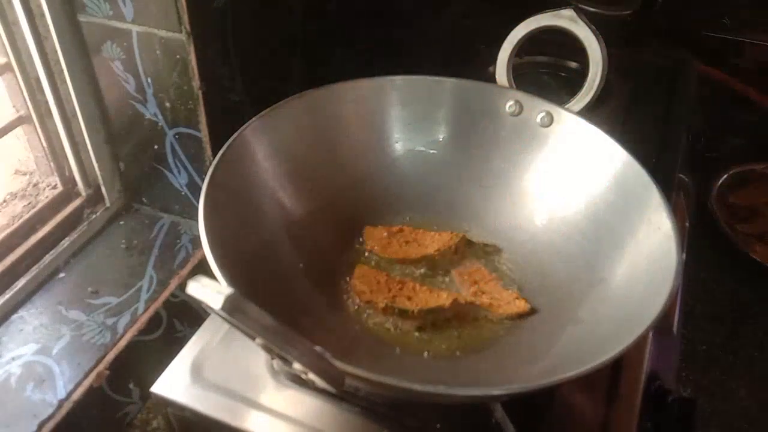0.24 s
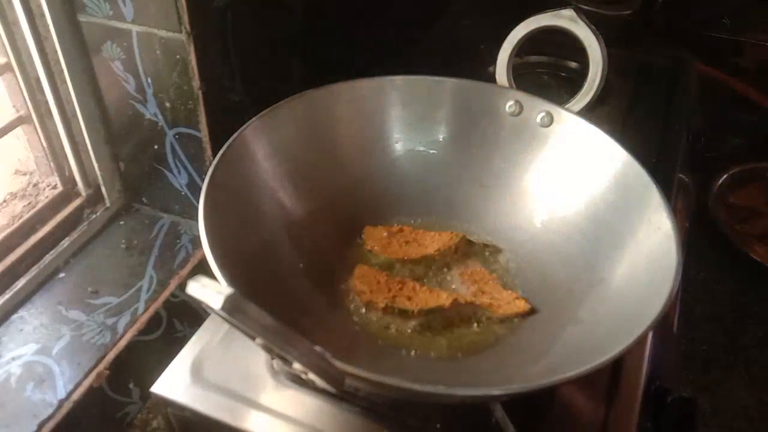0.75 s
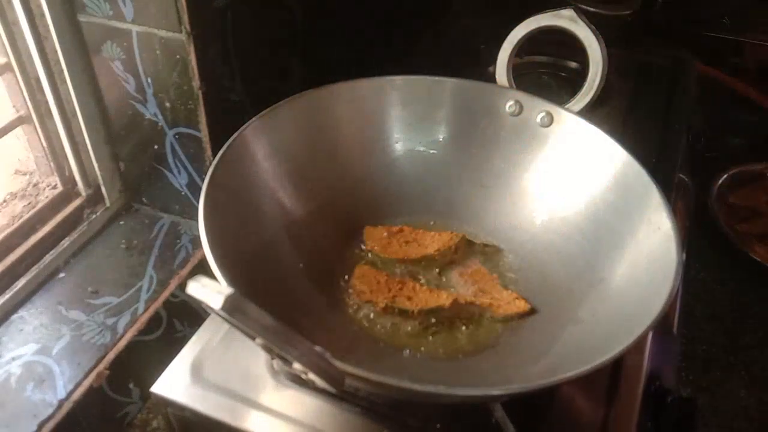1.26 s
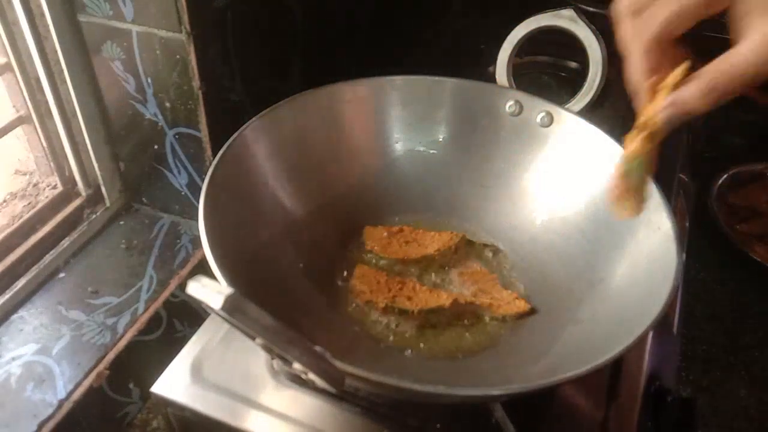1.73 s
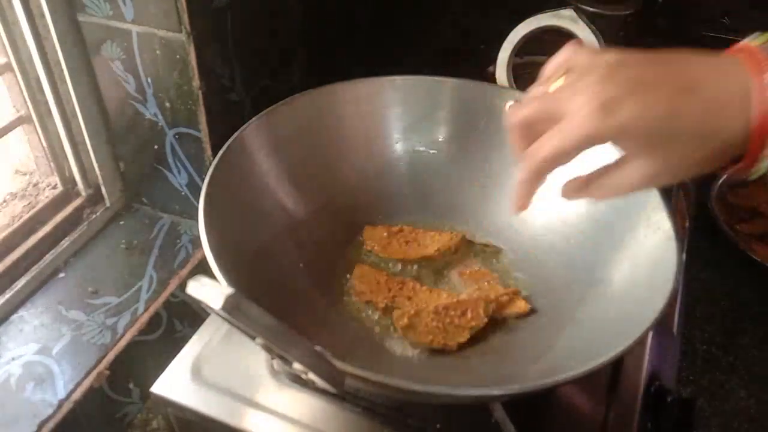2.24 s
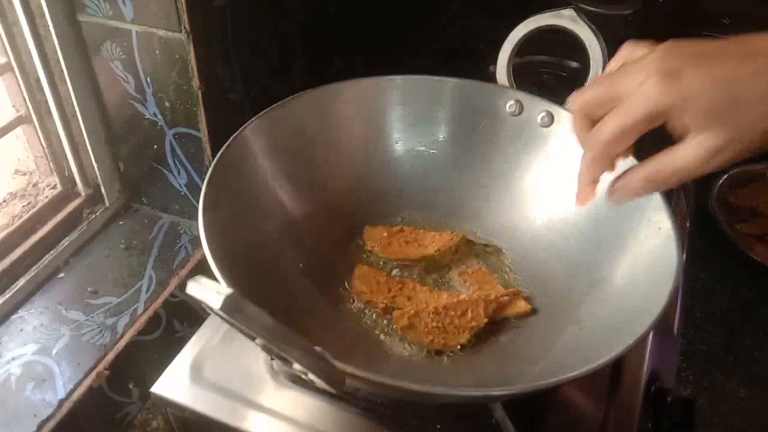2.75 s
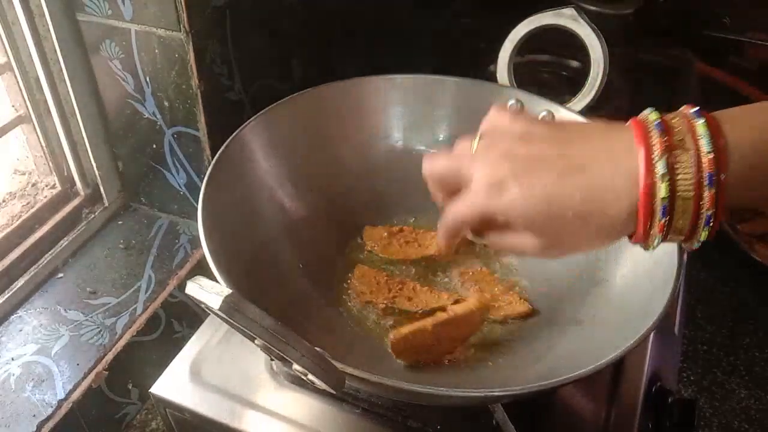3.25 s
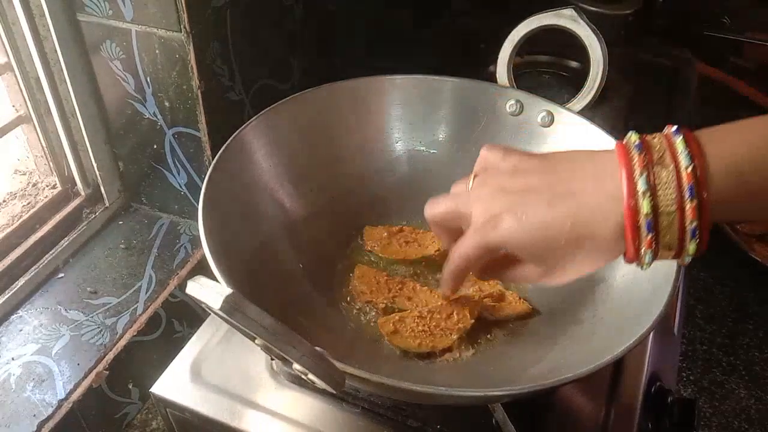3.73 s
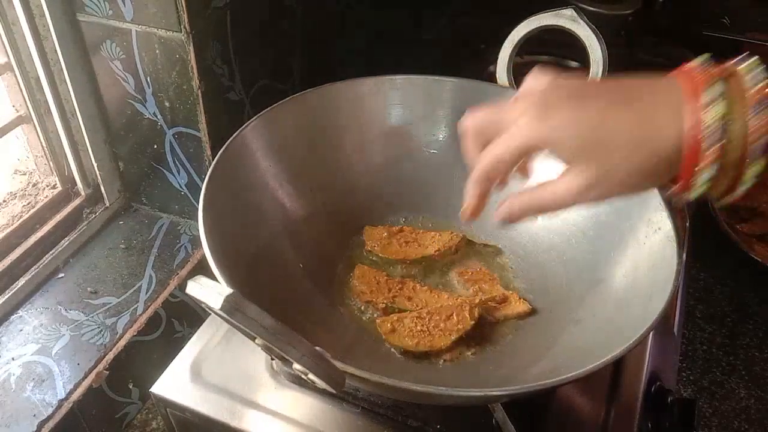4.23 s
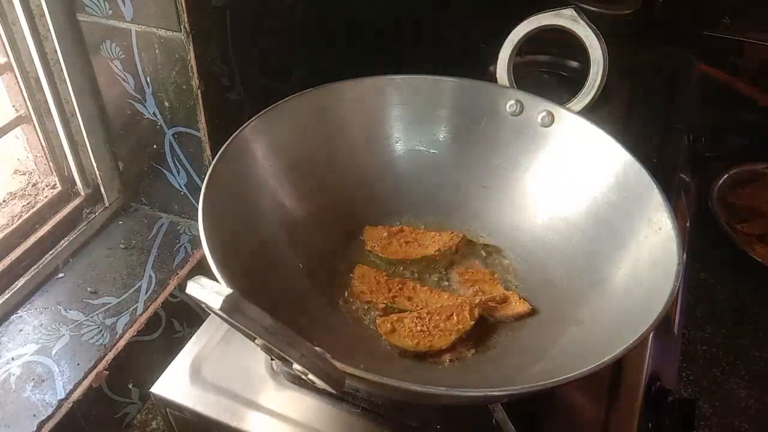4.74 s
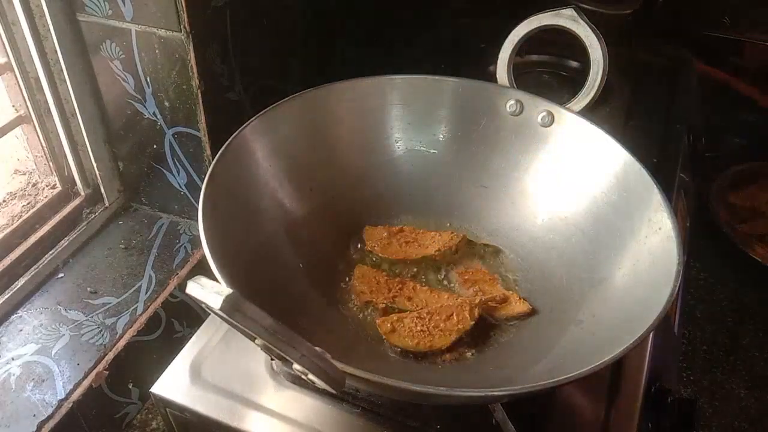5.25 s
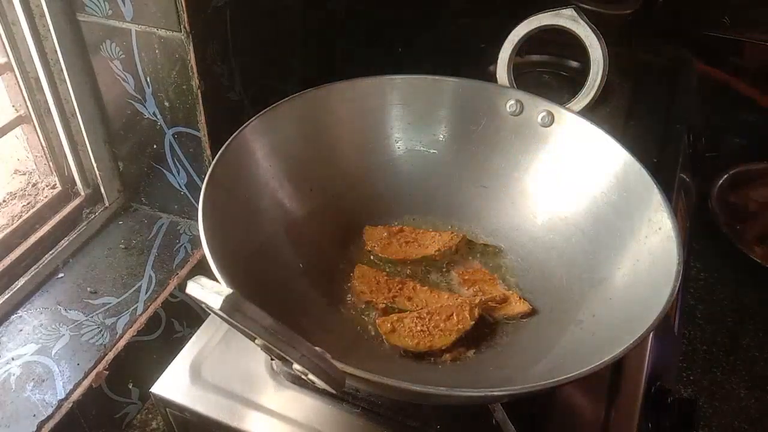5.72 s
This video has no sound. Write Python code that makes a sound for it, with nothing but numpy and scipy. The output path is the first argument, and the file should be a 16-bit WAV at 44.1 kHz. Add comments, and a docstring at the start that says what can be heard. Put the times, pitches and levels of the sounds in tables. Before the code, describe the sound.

Shallow frying in a steel wok, heard in stereo from just above it in a small kitchen with a very short echo. A quiet, low stove rush and faint hum continue throughout under bubbling oil and a thin, high fizz. At 0.1-0.25 s a few bubble pops and short steam puffs stand out; small spits and dry cracks tick between 0.4 and 0.7 s as the sizzle dips. From about 1.2 s pops become more frequent, with a sharp spit near 1.35 s. Between 2 and 4.6 s the boil strengthens: rapid, short, mid-high wet pops, deeper bubbling swells, faint metallic ringing from the bowl, and occasional spits that flare the fizz. It eases slightly around 4.7 s. At about 5.1 s the treble abruptly opens and the stereo image shifts; hard cracks and droplet flurries cluster until 5.55 s, then brighter sizzling and pops continue to the cut at 6 s.

```python
"""Small kitchen, microphone just above a steel wok: coated vegetable slices fry in shallow oil.
From the start a stove hums under small and deep bubbles and a fine fizz; steam rushes out, large bubbles pop.
The bowl and the walls answer. Then droplets spit, flaring the fizz, and trapped water cracks.
Close to 5.1 s the treble opens up, the stereo image shifts and flurries of droplets crackle.
Bubbles and spits are short decaying sines; cracks, steam, hiss and stove rush are shaped noise."""
import sys
import numpy as np
from scipy import signal
from scipy.fft import rfft, irfft, next_fast_len
from scipy.io import wavfile
from scipy.ndimage import uniform_filter1d, minimum_filter1d, map_coordinates

SR = 44100
rng = np.random.default_rng(int(sys.argv[2]) if len(sys.argv) > 2 else 0)


def int16_out(signal):
    """Quantize to a 16-bit WAV file."""
    q = np.round(np.clip(np.atleast_2d(signal).T, -1, 1) * 32767)
    wavfile.write(sys.argv[1], SR, q.astype(np.int16))


N = 263884

# Levels in the tables are relative: each source adds its own trim. Tone tables are spectral shapes.
# stove rush: [f/Hz, level/dB]
STOVE_TONE = [(15, -73), (25, -27), (43, -28.5), (97, -4.5), (140, -0.5), (183, -4), (269, -0.5),
              (302, -3.5), (333, 2.5), (368, -5), (401, 1), (504, -9), (606, -12), (750, -13.5),
              (980, -15.5), (1650, -120)]
# stove hum partials: [f/Hz, level/dB]
HUM_PARTIALS = [(134.6, -45.5), (204.6, -78), (274.5, -47), (403.7, -43.5)]
# deep bubbles under the slices, strength over time: [t/s, level/dB]
SIMMER_LEVEL = [(0, -44.5), (0.75, -43.5), (1.7, -44), (2.7, -39), (3.3, -41.5), (3.8, -35.5), (4.4, -41),
                (5.35, -39), (5.7, -35), (5.98, -38)]
# their spectrum: [f/Hz, level/dB]
SIMMER_TONE = [(500, -28), (800, -10.5), (1050, -3.5), (1260, 3), (1450, -19), (2000, -24.5), (4000, -76)]
# how hard the oil boils, as strength of the small bubbles: [t/s, level/dB]
BOIL_LEVEL = [(0.0, -30), (0.6, -35.5), (0.9, -36.5), (1.35, -28), (1.48, -34), (1.92, -26.5), (2.4, -29),
              (2.76, -31), (3.0, -23.5), (3.3, -28.5), (3.66, -25.5), (4.73, -29), (5.0, -25.5), (5.2, -31),
              (5.41, -30), (5.98, -28.5)]
# spectrum of the small bubbles: [f/Hz, level/dB]
BUBBLE_TONE = [(350, -60), (600, -21), (660, -12.5), (864, -10.5), (1240, -2.5), (1400, -14), (1630, -12.5),
               (1820, -6.5), (2040, -3.5), (2540, -1), (3010, -2.5), (3150, -12), (3500, -7), (4000, -43.5),
               (5200, -74), (8800, -120)]
# strength of the fizz: [t/s, level/dB]
FIZZ_LEVEL = [(0, -35.5), (0.1, -37.5), (0.3, -40), (0.5, -41.5), (0.78, -41.5), (0.84, -36.5), (0.87, -42),
              (0.93, -43), (0.98, -37.5), (1.35, -36), (1.48, -39), (1.6, -36), (1.9, -35.5), (2.18, -39),
              (2.3, -38), (2.9, -34), (3.85, -39.5), (4.06, -33), (4.3, -34.5), (4.38, -36.5),
              (4.47, -35.5), (4.65, -37), (5.21, -34.5), (5.26, -32.5), (5.35, -30), (5.41, -35),
              (5.47, -33), (5.55, -38), (5.6, -36), (5.67, -38), (5.75, -34), (5.98, -33.5)]
# spectrum of the fizz: [f/Hz, level/dB]
FIZZ_TONE = [(2120, -50), (3600, -6), (3940, -26), (5060, -3), (5750, -14), (6040, -18.5), (6820, 3),
             (7110, 5.5), (8080, -11), (9070, -7), (10400, -30), (11200, -18.5), (12300, -37), (14600, -26),
             (15400, -27)]
# spectrum of the fizz once it opens up: [f/Hz, level/dB]
OPEN_FIZZ_TONE = [(1940, -49), (3300, 6), (3800, -12.5), (4380, 2.5), (6090, -6), (6880, 2.5), (7290, -1),
                  (7700, -19), (8510, -19.5), (9400, -26), (10700, -7), (12100, -31), (15400, -53)]
# steam escaping from under the coating: [t/s, level/dB, rise/s, fall/s, centre f/Hz, width/octaves]
PUFFS = [(0.075, -32, .06, .02, 2800, .15), (0.203, -26, .003, .045, 1950, .3),
         (0.228, -28.5, .006, .04, 1100, .55), (0.706, -28, .002, .045, 2800, .17),
         (0.711, -37, .006, .014, 8800, .07)]
# large bubbles bursting: [t/s, level/dB, mid-glide cavity f/Hz, ring time/s, film snap level/dB]
POPS = [(0.083, -26, 2680, 0.0035, -2), (0.1057, -6.0, 2030, 0.0017, -4), (0.116, -11.5, 2430, 0.006, -18),
        (0.1302, -15, 2340, 0.0068, -13), (0.442, -4.5, 2220, 0.0027, -7), (0.7072, -19, 2850, 0.0035, -16),
        (0.8351, -15.5, 1230, 0.0031, -10), (0.9841, -8, 1320, 0.00077, 3),
        (1.1516, -11.5, 1860, 0.0032, -1), (1.245, -10, 1950, 0.0019, 11),
        (1.2934, -13.5, 2700, 0.0033, -14), (1.3896, -15, 2730, 0.0024, -2),
        (1.6232, -14.0, 2870, 0.0024, -1), (1.6404, -6.5, 2580, 0.0021, -15),
        (1.673, -12, 1220, 0.0018, -6), (1.7407, -11, 2640, 0.00062, -12),
        (1.7555, -14.5, 2630, 0.0054, -7), (1.852, -12.5, 2330, 0.0015, -1),
        (1.8622, -10.5, 2210, 0.0025, 5), (1.911, -13.5, 2310, 0.0041, -4), (1.93, -13.5, 2000, 0.0046, -5),
        (1.9602, -16, 2090, 0.0039, -1), (2.0282, -10.5, 2400, 0.0048, -4), (2.1087, -13, 2340, 0.0045, 1),
        (2.128, -12.5, 2690, 0.0041, -13), (2.175, -18, 2390, 0.0027, 7), (2.2209, -10, 2680, 0.0054, -3),
        (2.293, -8, 2690, 0.0029, 5), (2.3685, -18, 2900, 0.0031, -5), (2.4764, -9, 1870, 0.0028, 19),
        (2.514, -16.5, 2600, 0.0017, -3), (2.5893, -18, 2600, 0.0019, -9), (2.628, -9.5, 2150, 0.00077, 9),
        (2.6468, -13, 2425, 0.0048, 7), (2.6735, -9.5, 2677, 0.0015, -5), (2.6932, -9, 2460, 0.0038, 4),
        (2.7791, -23, 2410, 0.0035, 2), (2.8266, -7, 2420, 0.0018, 9), (2.876, -6.5, 2594, 0.0027, -17),
        (2.9044, -13, 1300, 0.0027, -3), (2.9708, -15, 2160, 0.0024, 17), (3.0613, -6, 2040, 0.0019, 2),
        (3.112, -8, 2437, 0.0026, 1), (3.1575, -9.5, 2150, 0.0029, 6), (3.1827, -14.0, 2720, 0.0023, -17),
        (3.2135, -7, 2230, 0.003, -17), (3.3321, -12.5, 2380, 0.00085, 7), (3.3632, -12, 2690, 0.0039, -11),
        (3.4191, -12.5, 2560, 0.0035, 4), (3.4463, -12.5, 2900, 0.0044, 5), (3.4834, -5, 2330, 0.001, -14),
        (3.5187, -8.0, 1990, 0.0015, 3), (3.5277, -6, 1910, 0.0046, 5.5), (3.543, -13.5, 1900, 0.0035, -1),
        (3.5895, -7.5, 1910, 0.0045, -1), (3.6683, -18, 2570, 0.0025, -3), (3.7143, -24, 2000, 0.0035, 2),
        (3.729, -6, 2130, 0.00075, 13), (3.7602, -11, 2720, 0.0022, 1), (3.7873, -18, 1310, 0.0035, -6),
        (3.8073, -12, 2610, 0.00079, -6), (3.8785, -4.5, 2435, 0.0047, 3.5),
        (3.8921, -7.5, 1440, 0.0017, -9), (3.967, -7.5, 2260, 0.0031, -1),
        (3.9846, -11.5, 2270, 0.0015, -10), (4.004, -12.5, 2700, 0.002, -15),
        (4.0233, -5, 2150, 0.00084, 7), (4.0578, -4.5, 1855, 0.0013, 1), (4.096, -7.5, 2360, 0.0025, 10),
        (4.1842, -7, 2275, 0.0013, 0), (4.207, -13, 2690, 0.0023, -11), (4.2634, -7.0, 2000, 0.0018, -3),
        (4.2843, -9.5, 2550, 0.0022, -12), (4.371, -2, 2055, 0.0027, -12), (4.497, -19, 1260, 0.0028, -6),
        (4.5191, -13.0, 2180, 0.001, -4), (4.5704, -4, 2187, 0.001, -5), (4.5934, -16, 2280, 0.0038, -5),
        (4.617, -13.5, 1250, 0.0025, -8), (4.7544, -9.5, 2620, 0.0029, 0), (4.7932, -14, 2630, 0.0035, -1),
        (4.8202, -15, 2660, 0.0033, -10), (4.8778, -9.5, 1790, 0.0039, -6),
        (4.9107, -17, 2490, 0.00084, -1), (4.9622, -15.5, 1250, 0.0024, -3),
        (5.0102, -6.5, 2360, 0.003, -17), (5.0436, -10, 2700, 0.002, -11), (5.1394, -13, 1240, 0.0031, -4),
        (5.1526, -8, 2360, 0.0018, 9), (5.163, -8.5, 2910, 0.0035, 4), (5.248, -9.5, 2640, 0.0015, -12),
        (5.2755, -7.5, 2370, 0.0026, -2.5), (5.3402, -7, 2120, 0.0029, 5), (5.4506, -11, 1840, 0.0021, 8),
        (5.4974, -8.5, 2170, 0.0015, 3), (5.5636, -16.0, 2270, 0.0023, -6), (5.5745, -6, 2200, 0.0016, 9),
        (5.6085, -8.5, 2960, 0.0024, -18), (5.6547, -15, 2460, 0.0054, 0), (5.733, -11.5, 2900, 0.003, 3),
        (5.7783, -12.5, 2390, 0.002, -10), (5.8034, -12, 2380, 0.0043, -8), (5.8222, -6, 1830, 0.004, 10),
        (5.8631, -12, 2470, 0.0038, -2), (5.91, -14.5, 2360, 0.0043, -8), (5.9365, -11, 2270, 0.0025, -5),
        (5.964, -10, 2540, 0.0021, -16)]
# steel modes of the wok: [f/Hz, level/dB, t60/s]
WOK_MODES = [(1037, 1, 0.17), (1270, 2, 0.11), (1510, -8, 0.16), (1842, 3.5, 0.044), (2040, -2, 0.19),
             (2230, 3, 0.11), (2410, -0.5, 0.13), (2596, 5.5, 0.17), (2720, -9, 0.32), (2800, 0, 0.17),
             (2980, 7, 0.2)]
# reverberation time of the kitchen: [f/Hz, t60/s]
KITCHEN_T60 = [(300, 0.17), (2500, 0.17), (10000, 0.14)]
# droplets spitting: [t/s, level/dB, starting f/Hz, decay of the fizz that follows/s]
SPITS = [(0.233, -12, 4860, 0.0014), (0.546, -18.5, 7000, 0.011), (0.603, -17.5, 6720, 0.017),
         (0.652, -17.5, 7030, 0.0067), (0.7088, -22, 8500, 0.003), (1.151, -20, 5000, 0.01),
         (1.2452, -20, 4470, 0.006), (1.348, -9.5, 7050, 0.012), (1.617, -15.5, 7350, 0.031),
         (1.6215, -20, 8770, 0.005), (1.905, -19, 7100, 0.023), (2.2855, -13.5, 6960, 0.053),
         (2.765, -18, 8300, 0.008), (2.8838, -24, 8850, 0.02), (3.1582, -16, 5200, 0.011),
         (3.546, -15.5, 7350, 0.08), (3.668, -18, 6940, 0.15), (3.9453, -16, 6970, 0.065),
         (4.046, -16, 7100, 0.023), (4.184, -15, 6900, 0.018), (4.2545, -20, 8400, 0.015),
         (5.1407, -16, 8100, 0.008), (5.144, -11.5, 5240, 0.037), (5.2551, -18, 4940, 0.02),
         (5.3125, -16, 4770, 0.008), (5.3455, -22, 7000, 0.022), (5.4427, -15, 4750, 0.016),
         (5.4965, -29, 4780, 0.0088), (5.5274, -11, 6420, 0.011)]
# spectrum of a spit's click: [f/Hz, level/dB]
CLICK_TONE = [(3000, -21), (6500, 18), (9000, -6), (11500, -23), (15000, -28)]
# dry, broad cracks of water bursting in the oil: [t/s, level/dB]
CRACKS = [(0.396, -20), (0.631, -30), (0.705, -17), (1.246, -30), (1.3897, -18), (5.1402, -23),
          (5.151, -11), (5.1644, -24), (5.247, -9.5), (5.277, -13), (5.3118, -14), (5.343, -19),
          (5.3489, -11), (5.364, -21), (5.433, -33), (5.453, -27), (5.465, -15.5), (5.488, -15),
          (5.5265, -14.5)]
# spectrum of a crack: [f/Hz, level/dB]
CRACK_TONE = [(500, -35), (1100, -1), (2200, -8), (3400, 9), (4000, -6), (5000, -7), (6000, -10), (7000, 7),
              (8000, -39), (11000, -45), (12500, -55), (15000, -68)]
# how far the sound has opened up: [t/s, share 0-1]
OPENING = [(5.07, 0.02), (5.16, 0.86)]
# flurries as moisture from a new slice meets the oil: [t/s, level/dB, decay/s]
FLURRIES = [(5.141, -33.5, 0.03), (5.245, -29, 0.07), (5.341, -35, 0.017), (5.443, -34, 0.08),
            (5.527, -33, 0.05)]
# their spectrum: [f/Hz, level/dB]
FLURRY_TONE = [(1500, -31), (3200, -3), (4300, 0), (6000, -5), (7000, 5), (7800, -20), (12000, -43)]
# phase between the microphone ports: [f/Hz, lead of the left/radians]
PORT_LEAD = [(100, -0.04), (520, -0.22), (900, 0.92), (1400, 1.88), (1750, 2.04), (2050, 0.56),
             (2400, 1.31), (2950, 1.54), (3200, 2.86), (3900, 3.03), (4750, 2.76), (5000, 0.43),
             (5400, -1.27), (6000, -0.02)]
# level between the ports: [f/Hz, left minus right level/dB]
PORT_LEAN = [(60, -1.5), (140, -0.5), (330, 2), (770, 3.5), (1170, 0.5), (1620, 5), (1870, 21), (2200, 3),
             (2500, 6), (3050, -2.5), (3550, 4.5), (4850, -3.5), (5300, 5.5), (6700, 16.5), (8400, 3.5),
             (15000, 6.5)]
# port phase in the opened sound: [f/Hz, lead of the left/radians]
OPEN_PORT_LEAD = [(100, -0.05), (520, -0.28), (900, 0.89), (1400, 1.68), (3400, 1.97), (3800, -0.49),
                  (6000, -0.91), (7000, -0.06)]
# port level in the opened sound: [f/Hz, left minus right level/dB]
OPEN_PORT_LEAN = [(60, -4), (99, 0), (160, 0.5), (270, 1.5), (450, 3), (740, 4), (1220, -0.5), (2010, 11.5),
                  (3330, -2), (5500, 17), (9080, 1), (15000, 22)]

STIR_DB, STIR_S = -19, 0.015  # small bubbles after a pop: offset from its table level, decay time
FLARE_DB = -16.5  # fizz after a spit: offset from its table level
SPURT_PER_S, SPURT_DB, SPURT_S = 24, 1, 0.006  # random spurts of fizz: rate, level over FIZZ_LEVEL, decay
STRAY_PER_S, STRAY_DB, STRAY_SPREAD_DB = 12, 1.5, 5.5  # small pops: rate, offset from BOIL_LEVEL, scatter
STRAY_HZ, STRAY_OCTAVES = 2420, 0.17  # their typical pitch and its scatter
STRAY_RING_S, STRAY_SNAP_DB = 0.00071, -4  # their ring time and film snap, as in POPS
TOP_HZ = 15500  # band limit


def amp(db):
    """Decibels to gain."""
    return 10 ** (np.asarray(db) / 20)


def unit(x):
    """Scale to rms 1."""
    return x / np.sqrt(np.mean(x ** 2) + 1e-20)


def along(points, hz):
    """Interpolate (Hz, value) points on a log frequency axis."""
    f, v = np.transpose(points)
    return np.interp(np.log(hz + 1), np.log(f + 1), v)


def curve(rows):
    """Interpolate (s, value) rows to one value per sample."""
    return np.interp(np.arange(N) / SR, *np.transpose(rows))


def wobble(rate):
    """A smooth random curve with rate knots a second."""
    return map_coordinates(rng.standard_normal(1024), [np.arange(N) * rate / SR], mode="wrap")


def filtered(x, response):
    """x times a complex response of frequency."""
    m = next_fast_len(N + SR // 2)
    hz = np.fft.rfftfreq(m, 1 / SR)
    return irfft(rfft(x, m) * response(hz), m)[..., :N]


def coloured(x, tone, size=4096):
    """x through a causal minimum-phase filter of the given spectral shape, scaled to rms 1."""
    hz = np.fft.rfftfreq(size, 1 / SR)
    cepstrum = irfft(np.log(amp(along(tone, hz)) + 1e-6))
    # folding the cepstrum forward makes the filter causal
    cepstrum[1:size // 2] *= 2
    cepstrum[size // 2 + 1:] = 0
    impulse = irfft(np.exp(rfft(cepstrum)))
    return unit(signal.fftconvolve(x, impulse[None], axes=1)[:, :N])


def add(track, s, sound):
    """Mix a sound into a stereo or single-row track at time s."""
    start = max(round(s * SR), 0)
    part = track[:, start:start + sound.shape[-1]]
    part += sound[..., :part.shape[1]]


def aftermath(events, rise_s=0.00044):
    """An envelope that rises quickly at each (s, dB, decay s) event and dies away."""
    out, t = np.zeros((1, N)), np.arange(SR // 3) / SR
    for s, db, decay_s in events:
        rise = 1 - np.exp(-(t / rise_s) ** 2)
        add(out, s, amp(db) * rise * np.exp(-np.abs(t / decay_s)))
    return out[0]


def paths(wet_db, apart_db, size=8192):
    """Direct sound plus the kitchen's decaying tail, nearly alike at two close microphone ports."""
    hz, t, z = signal.stft(rng.standard_normal((2, size)), SR, nperseg=256)
    decay = amp(-60 * t / along(KITCHEN_T60, hz)[:, None])
    mid, side = signal.istft(z * decay, SR, nperseg=256)[1]
    tail = np.array([mid + amp(apart_db) * side, mid - amp(apart_db) * side])
    # the nearest walls are a few ms away, so the tail builds up gradually
    tail = tail * (1 - np.exp(-(np.arange(len(mid)) / SR / 0.0013) ** 2))
    return amp(wet_db) * tail / np.linalg.norm(tail[0]) + signal.unit_impulse(len(mid))


def swarm(per_second, low_hz, high_hz, cycles, spread_db, wet_db, apart_db, count, size):
    """Random tiny decaying sines from count spots in the oil, each spot with its own echoes."""
    out, t = np.zeros((2, N)), np.arange(size) / SR
    for spot in rng.spawn(count):
        draws = spot.random((int(per_second * N / SR / count), 4))
        when, pitch, strength, life = draws.T[..., None]
        hz = low_hz * (high_hz / low_hz) ** pitch
        turns = t * hz
        # many weak bursts, few strong ones
        gain = amp(-spread_db * np.log(1 - .95 * strength)) * np.sqrt(hz / low_hz)
        envelope = (1 - np.exp(-2 * turns)) * np.exp(-turns / (cycles * (.5 + life)))
        rings = gain * np.sin(2 * np.pi * turns) * envelope
        samples = (when * N).astype(int) + np.arange(size)
        bursts = np.bincount(samples.ravel(), rings.ravel(), N)[:N]
        out += signal.fftconvolve(bursts[None], paths(wet_db, apart_db), axes=1)[:, :N]
    return out


def stove(level_db=-39.5, hum_db=-5.5, hiss_db=-74):
    """A steady low rush, near mono in the bass, with a weak phase-wavering hum and a trace of hiss."""
    mid, side = rng.standard_normal((2, N))
    width = [(30, -15), (90, -18.0), (380, -13.5), (650, 1.0)]  # (Hz, dB)
    side = filtered(side, lambda hz: amp(along(width, hz)))
    rush = coloured(np.array([mid + side, mid - side]), STOVE_TONE)
    t = np.arange(N) / SR
    hum = sum(amp(db + hum_db) * np.sin(2 * np.pi * hz * t + 2.84 * wobble(10)) for hz, db in HUM_PARTIALS)
    return amp(level_db) * rush + hum + amp(hiss_db) * rng.standard_normal((2, N))


def simmer(level_db=0.0):
    """Deeper bubbles roll out from under the slices: lower, longer rings that swell and ebb in level."""
    bed = swarm(per_second=260, low_hz=967, high_hz=1510, cycles=1.66, spread_db=6,
                wet_db=2, apart_db=-16, count=6, size=384)
    return amp(curve(SIMMER_LEVEL) + level_db) * coloured(bed, SIMMER_TONE)


def bubbles(level_db=-1.5, flurry_db=-0.1):
    """Smaller bubbles snap around the edges of the slices; each large pop in the table stirs them louder."""
    bed = swarm(per_second=400, low_hz=1390, high_hz=3330, cycles=0.69, spread_db=6.5,
                wet_db=2.5, apart_db=-10.0, count=12, size=256)
    steady = amp(curve(BOIL_LEVEL) + level_db + flurry_db * wobble(21.95))
    stirred = aftermath([(s, db + STIR_DB, STIR_S) for s, db, *_ in POPS])
    return np.hypot(steady, stirred) * coloured(bed, BUBBLE_TONE)


def fizz(opening, level_db=0.0, hiss_db=-10, flurry_db=-1.0):
    """Coating moisture boils off in tiny pitched crackles, flaring after spits; late on a spatter takes over."""
    grains = swarm(per_second=1300, low_hz=3824, high_hz=10530, cycles=2.0, spread_db=6.5,
                   wet_db=4.5, apart_db=-6.5, count=10, size=192)
    grains = unit(grains) + amp(hiss_db) * rng.standard_normal(N)  # the finest ones merge into hiss
    spatter = swarm(per_second=980, low_hz=3500, high_hz=9800, cycles=1.27, spread_db=7.5,
                    wet_db=3.5, apart_db=-4.0, count=8, size=128)
    fine = np.sqrt(1 - opening) * coloured(grains, FIZZ_TONE)
    coarse = np.sqrt(opening) * coloured(spatter, OPEN_FIZZ_TONE)
    steady = amp(curve(FIZZ_LEVEL) + level_db + flurry_db * wobble(21))
    flares = aftermath([(s, db + FLARE_DB, decay_s) for s, db, hz, decay_s in SPITS])
    when = rng.spawn(1)[0].random(int(SPURT_PER_S * N / SR)) * N / SR
    spurts = amp(curve(FIZZ_LEVEL)) * aftermath([(s, SPURT_DB, SPURT_S) for s in when])
    return np.sqrt(steady ** 2 + flares ** 2 + spurts ** 2) * (fine + coarse)


def stray_pops():
    """Small bubbles burst at random, stronger when the oil boils harder; rows as in POPS."""
    slot, size, pitch = rng.spawn(1)[0].standard_normal((int(STRAY_PER_S * N / SR), 3)).T
    when = np.abs(np.arange(len(slot)) + .5 + slot / 2) / STRAY_PER_S
    db = np.interp(when, *np.transpose(BOIL_LEVEL)) + STRAY_DB + STRAY_SPREAD_DB * size
    hz = STRAY_HZ * 2 ** (STRAY_OCTAVES * pitch)
    return [(*pop, STRAY_RING_S, STRAY_SNAP_DB) for pop in zip(when, db, hz)]


def puffs():
    """Trapped steam squirts out in short rushes of band noise; a narrow gap makes it squeak."""
    out, t = np.zeros(N), np.arange(N) / SR
    for s, db, rise, fall, centre_hz, octaves in PUFFS:
        band = lambda hz: np.exp(-(np.log2((hz + 1) / centre_hz) / octaves) ** 2 / 2)
        jet = filtered(rng.standard_normal(N), band)
        envelope = np.exp(-np.where(t < s, ((s - t) / rise) ** 2, (t - s) / fall))
        out += amp(db) * unit(jet) * envelope
    tone = [(2900, 2.5), (4000, -8), (4800, 0.0)]  # (Hz, dB)
    return filtered(out, lambda hz: amp(along(tone, hz)))


def pops(level_db=6.5, attack=0.0001, glide=0.072, skin_db=-2, skin_hz=1600, skin_s=0.0002,
         bowl_delay=0.00243, bowl_share=0.38, linger_db=-23, linger_s=0.063):
    """A bubble tears open: its cavity rings, rising, then lingers faintly; the bowl throws the burst back."""
    out, t = np.zeros((2, N)), np.arange(SR // 12) / SR
    for s, db, hz, life, snap_db in list(POPS) + stray_pops():
        pitch = hz * (1 + glide * (1 - 2 * np.exp(-t / life)))
        decay = np.exp(-(t / life) ** 2) + amp(linger_db) * np.exp(-t / linger_s)
        ring = np.sin(2 * np.pi * np.cumsum(pitch) / SR) * (1 - np.exp(-t / attack)) * decay
        skin = np.sin(2 * np.pi * skin_hz * t) * (t / skin_s) * np.exp(1 - t / skin_s)  # the film's snap
        burst = ring / np.abs(ring).max() + amp(skin_db + snap_db) * skin
        bounce_s = bowl_delay * rng.uniform(0.682, 1.307)
        burst = burst + bowl_share * np.interp(t - bounce_s, t, burst, left=0)
        burst = burst[None] / np.abs(burst).max()
        heard = signal.fftconvolve(burst, paths(wet_db=-5.5, apart_db=-11), axes=1)
        add(out, s, amp(db + level_db) * heard)
    tone = [(100, -34), (700, -22.0), (1150, -9.0), (3000, -8.5), (4000, -10.5), (9000, -22), (13000, -59)]
    return filtered(out, lambda hz: amp(along(tone, hz)))


def wok(x):
    """The boil keeps the steel bowl ringing: each mode is a narrow resonance set by its decay time."""
    def modes(f):
        return sum(amp(db) / (1 + 1j * (f - hz) * 2 * np.pi * t60 / np.log(1000)) for hz, db, t60 in WOK_MODES)
    return filtered(x, modes)


def spits(level_db=-2, life=0.0013, attack=0.0005, click_db=-15, click_s=0.00063):
    """Droplets spit with a bright noise click and a high, brief, rising ring."""
    out, t = np.zeros((2, N)), np.arange(SR // 80) / SR
    for s, db, hz, _ in SPITS:
        ring = np.sin(2 * np.pi * hz * t * (1 + 2 * t)) * (1 - np.exp(-t / attack)) * np.exp(-t / life)
        noise = rng.standard_normal(len(t)) * np.exp(-t / click_s)
        click = coloured(noise[None], CLICK_TONE)[:, :len(t)]
        spit = ring + amp(click_db) * click / np.abs(click).max()
        heard = signal.fftconvolve(spit, paths(wet_db=-3.0, apart_db=-10), axes=1)
        add(out, s, amp(db + level_db) * heard)
    return out


def cracks(level_db=-2.5, life=0.00084):
    """Water trapped under the oil bursts with a dry, unpitched crack of decaying noise."""
    out, t = np.zeros((2, N)), np.arange(SR // 100) / SR
    for s, db in CRACKS:
        noise = rng.standard_normal(len(t)) * np.exp(-t / life)
        burst = coloured(noise[None], CRACK_TONE)
        heard = signal.fftconvolve(burst / np.abs(burst).max(), paths(wet_db=-1, apart_db=-2), axes=1)
        add(out, s, amp(db + level_db) * heard)
    return out


def flurries(level_db=-3.0):
    """Runs of wet droplets hit the oil and crackle off in quick, dry snaps."""
    snaps = swarm(per_second=720, low_hz=3000, high_hz=7200, cycles=0.9, spread_db=5,
                  wet_db=-4, apart_db=-4, count=6, size=128)
    return amp(level_db) * aftermath(FLURRIES) * coloured(snaps, FLURRY_TONE)


def placed(x, lead, lean):
    """The ports hear each frequency apart in phase and level; their sum is kept, bar deep cancellations."""
    def response(hz):
        left = amp(along(lean, hz) / 2) * np.exp(.5j * along(lead, hz))
        centre = np.maximum(np.abs(left + 1 / left) / 2, .35)
        return np.array([left, 1 / left]) / centre
    return filtered(x, response)


def scene():
    """The frying and the stove, heard from just above the wok."""
    opening = np.clip(curve(OPENING), 0, 1)
    boil = simmer() + bubbles() + puffs() + pops()
    sound = stove() + boil + wok(boil) + fizz(opening) + spits() + cracks() + flurries()
    before = placed(sound, PORT_LEAD, PORT_LEAN)
    opened = placed(sound, OPEN_PORT_LEAD, OPEN_PORT_LEAN)
    return (1 - opening) * before + opening * opened


def record(dry):
    """A fast limiter holds the loudest peaks under full scale; nothing is kept above the band limit."""
    needed = 1 / np.maximum(np.abs(dry).max(axis=0) / .9, 1)
    gain = uniform_filter1d(minimum_filter1d(needed, size=257), size=129)
    return filtered(dry * gain, lambda hz: hz < TOP_HZ)


dry = scene()
out = record(dry)
int16_out(out)
```